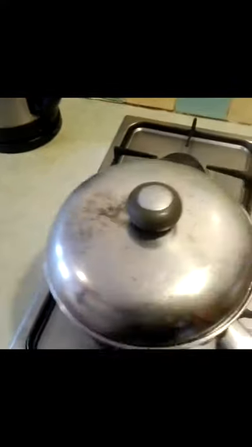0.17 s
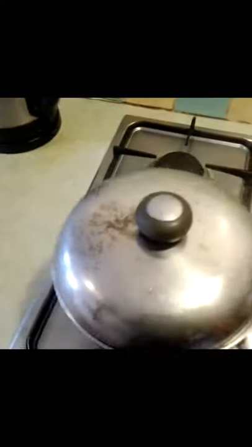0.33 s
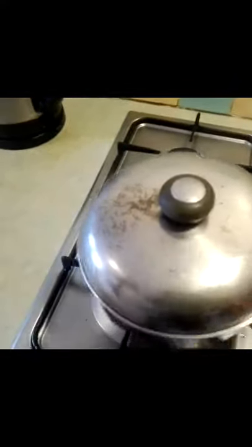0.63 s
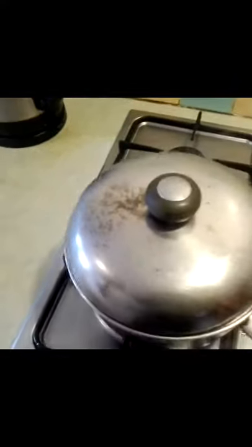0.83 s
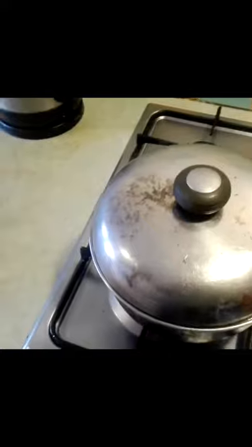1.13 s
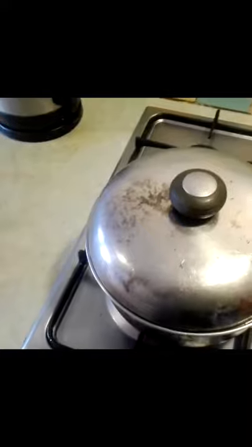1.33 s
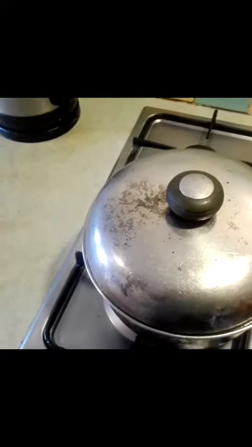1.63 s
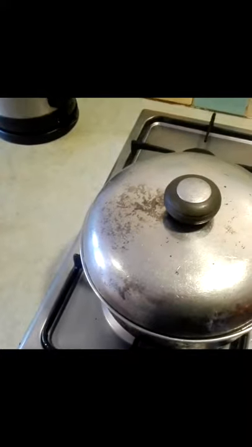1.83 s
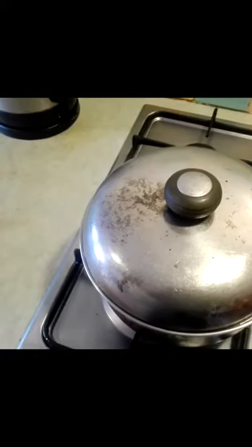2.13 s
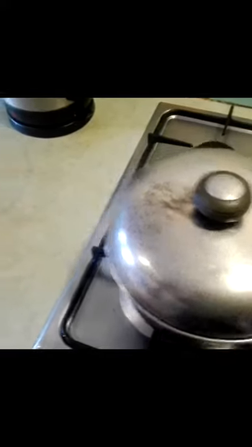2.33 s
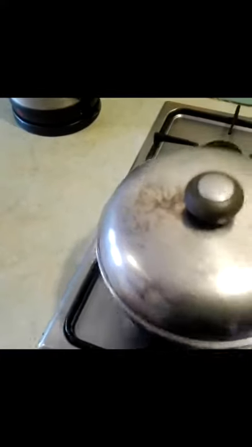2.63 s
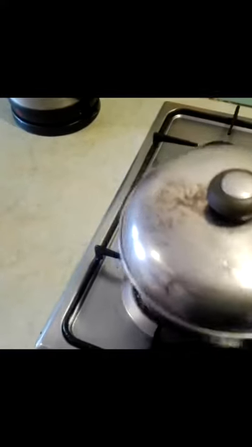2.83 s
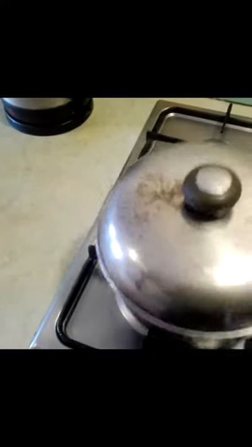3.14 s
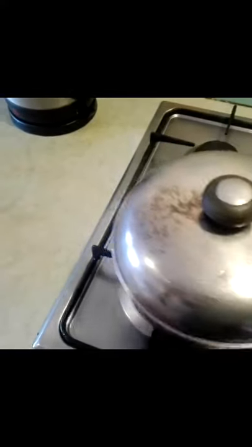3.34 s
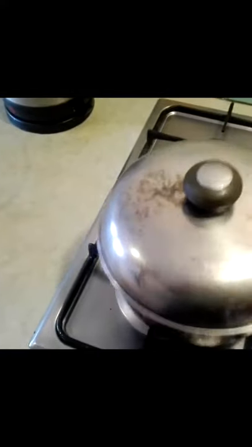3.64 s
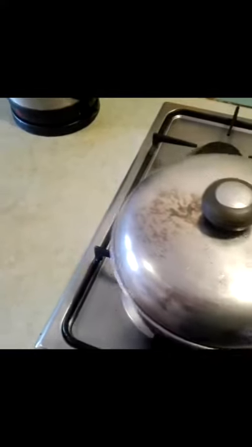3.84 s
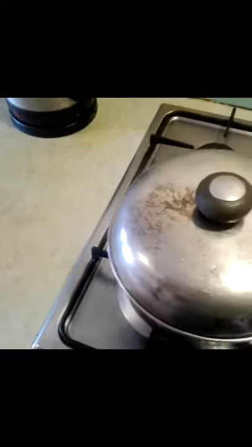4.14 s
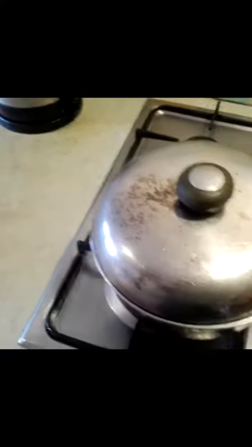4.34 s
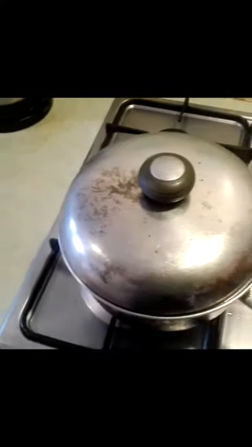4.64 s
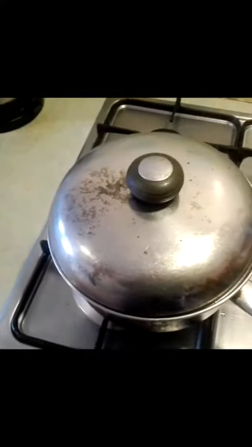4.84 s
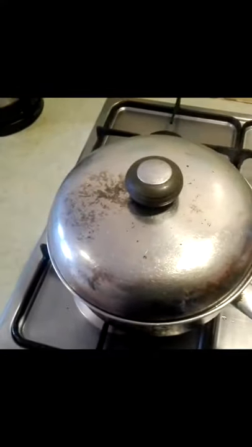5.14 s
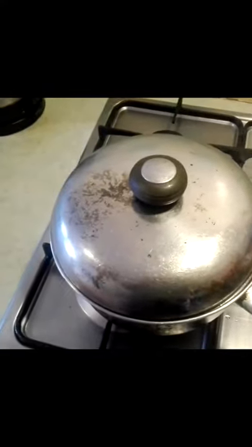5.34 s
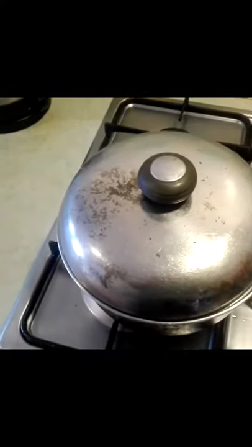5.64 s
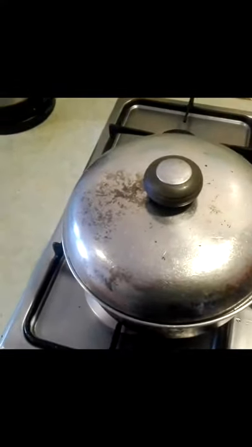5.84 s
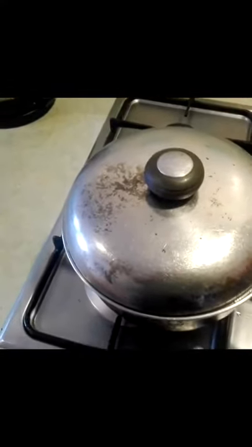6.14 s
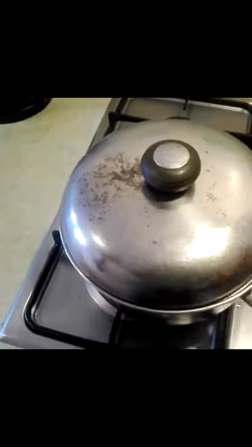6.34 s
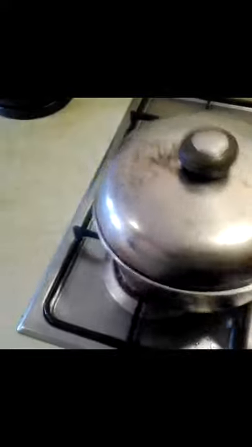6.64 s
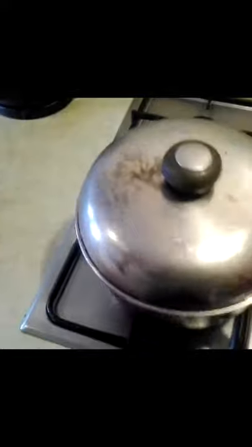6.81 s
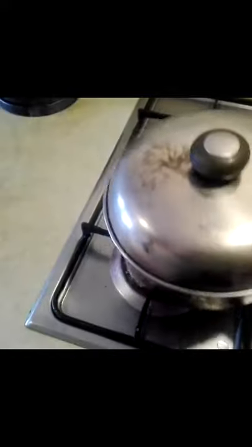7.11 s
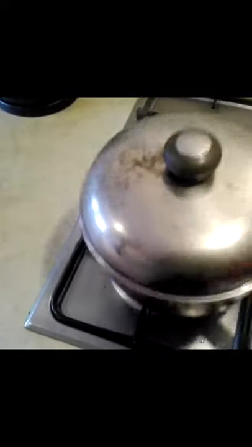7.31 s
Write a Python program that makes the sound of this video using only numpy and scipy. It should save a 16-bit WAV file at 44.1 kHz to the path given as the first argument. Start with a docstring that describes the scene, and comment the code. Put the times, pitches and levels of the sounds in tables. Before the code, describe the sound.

Popcorn in a metal pot, heard closely from just over the lid. Fast irregular pops, each a bright snap with a short metallic ring and dull boom, come over a faint low burner flutter. A rattling shake of steel against iron follows, mixed with more pops. Popping thins to lone bursts and soft taps before another rough shake, with one very heavy clang, ends it. The small room adds short reflections.

```python
"""Popcorn pops in a lidded steel pot on a gas hob, heard from just above the lid in a small kitchen.
Each kernel makes a noisy click, rings the lid and booms through the low notes of the hollow pot.
Now and then the pot is shaken: random little slips scrape, corn clacks and low noise rumbles in the hob.
The pot also knocks on the iron grate with a clang, a tick and a thud. Faint taps and a rattle come between.
The burner is softly fluttering low noise underneath."""
import sys
import numpy as np
from scipy import signal
from scipy.fft import rfft, irfft
from scipy.io import wavfile
from scipy.ndimage import uniform_filter1d, map_coordinates

SR = 44100
rng = np.random.default_rng(int(sys.argv[2]) if len(sys.argv) > 2 else 0)


def store_wav(level_fs):
    """Save 16-bit WAV to argv[1]."""
    pcm = np.round(np.clip(np.atleast_2d(level_fs), -1, 1) * 32767)
    wavfile.write(sys.argv[1], SR, pcm.T.astype(np.int16))


N = 329427
TIME = np.arange(N) / SR  # time in the scene [s]
AGE = np.arange(SR // 2) / SR  # time since a blow [s]

# Event levels are set before each layer's own trim; levels of notes and colours are relative.
# bursting kernels: (time [s], crack [dB], lid ring [dB], lid pitch [Hz], hollow boom [dB])
KERNELS = [(-.05, -7.5, -33, 1390, -27.5), (0.2294, -13, -30, 1362, -20), (0.4916, -15, -33, 1450, -21),
           (0.628, -27.5, -26.5, 1452, -26.5), (0.7344, -19.5, -32, 1367, -29.5),
           (0.8133, -26.5, -41, 1390, -22.5), (0.9158, -17.5, -33, 1240, -24.5),
           (0.974, -34.5, -48, 1410, -27.5), (1.107, -34.5, -40.5, 1324, -32.5),
           (1.258, -26.5, -34.5, 1110, -29.5), (1.3658, -23.5, -38, 1220, -24),
           (1.459, -31.5, -41.5, 1330, -35.5), (1.4875, -27, -34, 1360, -30.5),
           (1.499, -23.5, -33.5, 1330, -34), (1.6203, -20, -35.5, 1410, -26.5),
           (1.7294, -28.5, -43.5, 1390, -27.5), (1.8029, -48, -47.5, 1580, -39),
           (1.8278, -34.5, -64.5, 1530, -49), (2.2264, -5.5, -31, 1410, -42.5),
           (2.5211, -28.5, -35.5, 1360, -25.5), (2.916, -15, -32.5, 1456, -30),
           (3.1014, -41, -41.5, 1034, -36), (3.144, -23.5, -33.5, 1400, -22),
           (3.2028, -32.5, -33, 1790, -44), (3.5322, -25, -40, 1470, -25.5), (3.613, -22, -26.5, 1306, -21),
           (3.708, -33, -34.5, 1600, -37), (3.8156, -8, -23, 1350, -30.5),
           (4.0899, -29.5, -34.5, 1340, -28), (4.1513, -35, -36, 1354, -25.5),
           (4.1985, -26, -36.5, 1270, -27), (4.2055, -23, -38.5, 1334, -32.5),
           (4.9715, -24.5, -29, 1637, -23.5), (5.8872, -23, -45.5, 1486, -31.5),
           (6.3049, -35, -39, 1480, -33), (7.202, -13.5, -33, 1314, -26.5), (7.2871, -30, -34, 1370, -24.5)]
# notes of the lid's edge that sing on: (time [s], pitch [Hz], level before rise and decay [dB])
SINGING_NOTES = [(0.2298, 3560, -59), (2.2256, 4220, -50), (5.8874, 4210, -49.5)]
# the pot bumps on the grate: (time [s], clang [dB], clang pitch [Hz], metal tick [dB], hob thud [dB])
GRATE_BUMPS = [(0.338, -23.5, 1360, -58, -22.5), (0.376, -24.5, 1290, -41.5, -44),
               (0.584, -34, 1640, -52, -46.5), (2.385, -41, 1290, -40, -46), (2.587, -34.5, 1160, -37, -28),
               (2.638, -19.5, 1650, -25.5, -27), (2.718, -17, 1700, -18.5, -21),
               (2.75, -26, 1400, -55, -28.5), (2.793, -25.5, 1420, -55, -25.5),
               (2.836, -17.5, 1380, -28, -42), (2.937, -33, 1630, -49, -53), (3.083, -34, 1150, -69, -31.5),
               (3.245, -22, 1040, -54, -16), (3.263, -23, 1350, -29, -29), (3.288, -20, 1420, -36, -27),
               (3.35, -29, 1540, -35.5, -44), (3.428, -33, 1600, -46, -60), (3.515, -40, 1310, -61, -57),
               (3.648, -24.5, 1280, -35, -33), (3.69, -34, 991, -44, -22), (3.761, -25, 1400, -35, -19),
               (3.821, -21.5, 1420, -19.5, -29.5), (3.942, -36, 1400, -57, -73),
               (6.55, -39.5, 1364, -56, -64), (6.625, -38.5, 1310, -40, -37.5),
               (6.745, -36, 1370, -53, -30.5), (6.761, -21, 1680, -23.5, -22),
               (6.819, -16.5, 1380, -21, -22), (6.892, -4.5, 1303, -21.5, -12.5),
               (6.954, -20.5, 1380, -31, -31), (7.022, -21, 1040, -56, -52.5),
               (7.346, -23, 1450, -31, -18.5), (7.366, -20.5, 1380, -31.5, -30),
               (7.437, -18.5, 1300, -22, -16.5)]
# soft dull taps: (time [s], level [dB])
SOFT_TAPS = [(2.119, -54), (5.245, -36), (5.343, -47), (5.8, -45.5), (5.991, -44), (6.089, -51),
             (6.128, -51.5)]
# a faint hollow rattle: (time [s], level [dB])
FAINT_RATTLE = [(5.41, -40.5), (5.428, -40), (5.454, -35.5), (5.478, -43)]
# vigour of each bout of shaking: (time [s], vigour [dB])
SHAKING_BOUTS = [
    [(0.0, -59), (0.282, -64), (0.406, -56.5), (0.524, -49), (0.798, -57), (0.918, -46), (0.98, -51.5)],
    [(2.36, -57), (2.402, -52.5), (2.594, -66), (2.772, -31), (2.822, -44), (2.914, -39.5), (2.98, -46)],
    [(3.12, -45), (3.346, -44), (3.678, -47), (3.788, -41), (3.924, -52.5), (4.05, -58.5)],
    [(6.4, -56.5), (6.476, -61.5), (6.646, -49.5), (6.68, -71)],
    [(6.77, -61), (6.81, -35), (6.926, -50), (7.078, -42), (7.234, -49), (7.47, -50)],
]

# ringing notes of the air in the pot: (pitch [Hz], level [dB], time to fall 60 dB [s])
HOLLOW_NOTES = [(42, -14, 0.28), (67.63, -12.5, 0.64), (92.9, -1.5, 0.22), (174.6, 2.5, 0.12),
                (218.9, 2, 0.21), (217.6, 11, 0.004), (244, -8, 0.088), (345, -18.5, 0.24)]
# ringing notes of the lid: (pitch [Hz], level [dB], time to fall 60 dB [s])
LID_NOTES = [(1064, -12, 0.19), (1043, 1, 0.086), (1192, 0, 0.19), (1303, 6.5, 0.14), (1400, -1, 0.22),
             (1610, -2, 0.3), (1750, -9, 0.055), (1890, -15.5, .2), (1943, -8.5, 0.18), (2350, -13, 0.2)]
# ringing notes of the lid's edge: (pitch [Hz], level [dB], time to fall 60 dB [s])
EDGE_NOTES = [(2190, -4, 0.17), (2700, -5, 0.1), (2965, -10.5, 0.34), (3620, -7, 0.25), (4103, -8, 0.12),
              (4340, -2, 0.27), (4830, -9.5, 0.11), (5370, 1.5, 0.11), (5510, -1, 0.11), (6130, 15, 0.023)]
# ringing notes of the pot: (pitch [Hz], level [dB], time to fall 60 dB [s])
POT_NOTES = [(581, -21.5, 0.036), (699, -18.5, 0.17), (820, -22, 0.33), (986, 1, 0.075), (1086, -4.5, 0.23),
             (1075, -10, .2), (1170, -16.5, 0.25), (1265, -16, 0.1), (1384, -4.5, 0.25), (1436, -9, 0.2),
             (1475, -22.5, .25), (1586, -3, 0.22), (1637, -12, .2), (1720, -18, 0.16)]
# low notes of the hob: (pitch [Hz], level [dB], time to fall 60 dB [s])
HOB_NOTES = [(39, 2, 0.69), (45.34, 0, 0.54), (55.9, 5, 0.32), (66.3, -0.5, 0.59), (73, -7, 0.14),
             (98.4, -14.5, 1)]

# colour of the hull's crack: (frequency [Hz], level per Hz [dB])
CRACK_COLOUR = [(3000, -39), (6000, -17), (7500, -6.5), (8500, 2.5), (9400, 1), (10300, -6.5),
                (11600, -9.5), (12600, -14), (14000, -21), (16000, -39)]
# colour of the snap at the lid: (frequency [Hz], level per Hz [dB])
SNAP_COLOUR = [(1200, -30), (2100, -9.5), (2450, -20.5), (2900, -8.5), (3400, -11), (4400, -7),
               (5400, -5.5), (6500, -6.5), (8000, -0.5), (12000, -35)]
# colour of the struck lid and the pot's clang: (frequency [Hz], level per Hz [dB])
CLANG_COLOUR = [(300, -48), (750, -24.5), (950, -6), (1130, 1), (1400, 5.5), (1650, -5.5), (1850, -12),
                (2100, -9), (2500, -26), (5000, -47.5)]
# colour of the metal tick and the sliding hiss: (frequency [Hz], level per Hz [dB])
TICK_COLOUR = [(1200, -19.5), (2000, 2.5), (2400, -4.5), (2700, -4), (3300, -9.5), (4400, -2), (7300, -4.5),
               (8600, -0.5), (10500, -6.5), (14000, -25)]
# colour of the base's dull knock: (frequency [Hz], level per Hz [dB])
KNOCK_COLOUR = [(80, -25.5), (160, -1), (240, 6), (350, -0.5), (430, -8.5), (490, -10.5), (550, -6.5),
                (660, -16), (900, -8), (2000, -44.5)]
# colour of the soft taps: (frequency [Hz], level per Hz [dB])
TAP_COLOUR = [(25, -11), (65, 8.5), (130, 7), (250, -5), (400, -23), (550, -21.5), (750, -30), (1400, -30),
              (2000, -55)]
# colour of the faint rattle: (frequency [Hz], level per Hz [dB])
RATTLE_COLOUR = [(100, -8), (220, 3.5), (300, -4.5), (450, -34), (640, -20), (850, -11), (1100, -23),
                 (1340, -9.5), (1570, -30), (1850, -13), (2050, -29.5), (2400, -59)]
# colour of the corn and the scrape: (frequency [Hz], level per Hz [dB])
SCRAPE_COLOUR = [(400, -16), (750, -23), (1000, -5), (1380, 1), (1650, 1), (2100, -9.5), (2500, -22.5),
                 (2900, -22.5), (3600, -26.5), (6000, -41)]
# colour of the base rubbing on the grate: (frequency [Hz], level per Hz [dB])
RUB_COLOUR = [(100, -31.5), (230, 0.5), (350, 9), (450, -1.5), (550, -9), (750, -22), (2000, -43.5)]
# colour of the boom in the kitchen: (frequency [Hz], level per Hz [dB])
BOOM_COLOUR = [(50, -16.5), (97, 3), (130, -12.5), (175, -2.5), (222, 1.5), (275, -13), (305, -17),
               (350, -8.5), (420, -25.5), (700, -47.5)]
# colour of the flame: (frequency [Hz], level per Hz [dB])
BURNER_COLOUR = [(15, -34), (25, 7.5), (36, 6.5), (136, -26.5), (244, -23), (525, -36), (802, -39),
                 (892, -30), (1160, -29.5), (2030, -34.5), (2310, -39.5), (3180, -36), (3440, -38.5),
                 (5120, -39), (14000, -40.5)]

# a harder burst snaps louder, and its click stands further out of its echoes [dB, then dB per dB]
SNAP_DB, SNAP_PER_CRACK, SNAP_PER_LID = -13.5, 0.42, 0.27
CLICK_DB, CLICK_PER_CRACK = 4, 0.31
SNAP_HZ, SNAP_SCATTER = 5390, 0.067  # middle pitch of the edge's note, and its spread (log scale)
EDGE_DB, TING_DB = -7, -9.5  # the edge's notes and its strongest note, beside the snap
SING_RISE_S, SING_T60_S = .015, 0.37
# the dull knock grows with both clang and thud [dB, then dB per dB]
KNOCK_DB, KNOCK_PER_CLANG, KNOCK_PER_THUD = -2.5, 0.83, 0.3
VIGOUR_DB = -47  # an ordinary shake
SETTLE_DB_PER_S = 231  # how fast vigour grows before a bout and falls after it
LURCH_HZ = 14  # knots a second in the uneven sliding
BURNER_DB = -61  # middle level of the fluttering flame
TOP_HZ = 14400  # upper band limit of the microphone


def amp(db):
    """Turn decibels into gain."""
    return 10 ** (np.asarray(db) / 20)


def unit(x):
    """Scale to an average (rms) level of 1."""
    return x / np.sqrt(np.mean(x ** 2) + 1e-20)


def crest(x, size=176):
    """Scale so that the loudest few milliseconds have rms 1."""
    return x / np.sqrt(uniform_filter1d(x ** 2, size).max() + 1e-20)


def wobble(rate):
    """Draw a smooth random curve with this many knots a second."""
    knots = rng.standard_normal(int(N * rate / SR) + 4)
    return map_coordinates(knots, [TIME * rate])


def colour(points, size=4096):
    """Make a filter whose strength at each frequency follows the points and that answers at once."""
    hz, db = np.transpose(points)
    bins = np.log(np.fft.rfftfreq(size, 1 / SR) + 1)
    gain = amp(np.interp(bins, np.log(hz), db))
    # folding this log spectrum puts the filter's energy as early as possible
    cepstrum = irfft(np.log(gain))
    cepstrum[1:size // 2] *= 2
    cepstrum[size // 2 + 1:] = 0
    return irfft(np.exp(rfft(cepstrum)))


def varied(points):
    """Make a colour filter with small random changes, since no two blows are quite alike."""
    hz, db = np.transpose(points)
    return colour(np.transpose([hz, db + 2 * rng.standard_normal(len(hz))]))


def through(x, response):
    """Pass x through a filter, an echo pattern or a ringing body."""
    return signal.fftconvolve(x, response)[:len(x)]


def partials(modes):
    """Make one dying oscillation, as complex numbers, for each note of a body."""
    hz, db, t60 = np.transpose(modes)[:, :, None]
    return amp(db - 60 * AGE / t60) * np.exp(2j * np.pi * hz * AGE)


def steel(t60, count=110):
    """Make the dense thicket of treble notes that thin steel has."""
    hz = np.linspace(2400, 14000, count) + rng.uniform(-50, 50, count)
    level = 2 * rng.standard_normal(count)
    return partials(np.transpose([hz, level, np.full(count, t60)]))


def favour(rows, hz, lift_db, width):
    """Lift, in dB, the notes near the pitch that a blow excites most."""
    return lift_db * np.exp(-(np.log(np.transpose(rows)[0] / hz) / width) ** 2)


def ring(bank, spread_db, bias_db=0):
    """Ring a body: each blow lands elsewhere, so it weights the notes anew."""
    level, phase = rng.standard_normal(len(bank)), rng.random(len(bank))
    weights = amp(spread_db * level + bias_db) * np.exp(2j * np.pi * phase)
    soft_start = 1 - np.exp(-AGE / 0.00086)
    return crest((weights @ bank).real * soft_start)


def echoes(pot_t60, room_db, room_t60):
    """Dense reflections as noise: a quick flurry in the pot, then the kitchen's tail."""
    fade = amp(-60 * AGE / pot_t60) + amp(room_db - 60 * AGE / room_t60)
    return rng.standard_normal(len(AGE)) * fade


def impulse():
    """A single sharp click."""
    return signal.unit_impulse(len(AGE))


def fading_tone(hz, t60):
    """One pure note that dies away."""
    return crest(amp(-60 * AGE / t60) * np.sin(2 * np.pi * hz * AGE))


def add(track, s, sound):
    """Mix a sound into the track from time s on."""
    start = round(s * SR)
    sound = sound[max(-start, 0):]  # skip what lies before the scene starts
    part = track[max(start, 0):][:len(sound)]
    part += sound[:len(part)]


def burner():
    """The low flame flutters softly: coloured noise with a wandering level."""
    flame = unit(through(rng.standard_normal(N), colour(BURNER_COLOUR)))
    return amp(BURNER_DB + 3.1 * wobble(6.7)) * flame


def taps():
    """Faint muffled taps and a brief rattle: coloured echoes, led by a click in the taps."""
    out = np.zeros(N)
    for s, db in SOFT_TAPS:
        push = amp(29.0) * impulse() + echoes(pot_t60=0.061, room_db=-6.0, room_t60=0.31)
        add(out, s, amp(db - 2.0) * crest(through(push, colour(TAP_COLOUR))))
    for s, db in FAINT_RATTLE:
        shake = echoes(pot_t60=0.054, room_db=-8.5, room_t60=0.53)
        add(out, s, amp(db - 10) * crest(through(shake, colour(RATTLE_COLOUR))))
    return out


def grit(rate, spread_db):
    """Tiny slips of uneven size at random moments."""
    happens = rng.random(N) < rate / SR
    return happens * rng.standard_normal(N) * amp(spread_db * rng.standard_normal(N))


def tumbling(rate, spread_db, size=2600):
    """Puffed corn tumbles against the wall: little clacks, each at its own pitch."""
    out, age = np.zeros(N), AGE[:size]
    for when, pitch, weight in rng.random((int(rate * N / SR), 3)):
        hz = 900 * 2.4 ** pitch
        clack = np.sin(2 * np.pi * hz * age) * amp(-60 * age / age[-1])
        add(out, when * N / SR, amp(spread_db * weight) * clack)
    return unit(out)


def stirred(db, growth, uneven_db):
    """Gain that follows the shaking: dB at ordinary vigour, dB per dB of vigour, unevenness in dB."""
    bouts = []
    for s, level in map(np.transpose, SHAKING_BOUTS):
        outside = np.abs(TIME - np.clip(TIME, s[0], s[-1]))  # seconds away from this bout
        bouts.append(np.interp(TIME, s, level) - SETTLE_DB_PER_S * outside)
    vigour = np.max(bouts, axis=0) - VIGOUR_DB
    return amp(db + growth * vigour + uneven_db * wobble(LURCH_HZ))


def sliding():
    """The base stutters over the grate, stirring the pot's notes, tossing the corn and rocking the hob."""
    slips = grit(rate=3400, spread_db=2) * amp(2 * wobble(35))
    clacks = unit(through(tumbling(rate=190, spread_db=16, size=2300), colour(SCRAPE_COLOUR)))
    scrape = unit(through(slips, colour(SCRAPE_COLOUR)))
    drone = unit(through(slips, partials(POT_NOTES).real.sum(axis=0)))
    corn = unit(clacks + amp(-4) * scrape + amp(-10) * drone)
    rub = unit(through(slips, colour(RUB_COLOUR)))
    # the kitchen smears the fine treble of the slips into a smooth hiss
    smeared = through(slips, echoes(pot_t60=.05, room_db=-6, room_t60=.3))
    hiss = unit(through(smeared, colour(TICK_COLOUR)))
    rumble = unit(through(rng.standard_normal(N), partials(HOB_NOTES).real.sum(axis=0)))
    out = stirred(db=-50, growth=0.88, uneven_db=2.3) * corn
    out += stirred(db=-54.5, growth=.8, uneven_db=6.7) * rub
    out += stirred(db=-61.5, growth=.7, uneven_db=3) * hiss
    out += stirred(db=-47.5, growth=0.73, uneven_db=2) * rumble
    return out


def knocks():
    """Steel meets the iron grate: a tick, the pot's clang, a dull knock and a slow thud of the hob."""
    out = np.zeros(N)
    pot, hob, thicket = partials(POT_NOTES), partials(HOB_NOTES), steel(t60=0.2)
    for s, clang_db, clang_hz, tick_db, thud_db in GRATE_BUMPS:
        blow = amp(17) * impulse() + echoes(pot_t60=.05, room_db=-15, room_t60=.27)
        clang = crest(through(blow, varied(CLANG_COLOUR)))
        note = ring(pot, spread_db=3.5, bias_db=favour(POT_NOTES, clang_hz, lift_db=9.0, width=0.066))
        add(out, s, amp(clang_db - 13) * clang + amp(clang_db - 11) * note)

        shimmer = amp(-5) * ring(thicket, spread_db=5)
        metal = shimmer + echoes(pot_t60=0.06, room_db=-4, room_t60=0.34)
        add(out, s, amp(tick_db - 10.5) * crest(through(metal, varied(TICK_COLOUR))))

        knock_db = KNOCK_DB + KNOCK_PER_CLANG * clang_db + KNOCK_PER_THUD * thud_db
        base = echoes(pot_t60=0.07, room_db=-6.0, room_t60=0.43)
        add(out, s, amp(knock_db - 6.0) * crest(through(base, varied(KNOCK_COLOUR))))

        thud = ring(hob, spread_db=7) * (1 - np.exp(-AGE / 0.0024))
        add(out, s, amp(thud_db - 4.5) * crest(thud))
    return out


def singing():
    """A kernel hits the lid's edge squarely, and one lightly damped note outlasts the pop."""
    out = np.zeros(N)
    for s, hz, db in SINGING_NOTES:
        envelope = amp(db - 60 * AGE / SING_T60_S) * (1 - np.exp(-AGE / SING_RISE_S))
        add(out, s, envelope * np.sin(2 * np.pi * hz * AGE))
    return out


def hull_tear():
    """The hull tears as a click with very brief noise, and the lid throws it back a moment later."""
    tear = rng.standard_normal(len(AGE)) * amp(-60 * AGE / .003)
    tear = tear / np.linalg.norm(tear) + impulse()
    return tear + amp(-7) * np.roll(tear, round(SR * rng.uniform(.0008, .0016)))


def crack(tear, shimmer, click_db):
    """The torn hull's click, with a little steel shimmer and dense echoes."""
    split = amp(click_db + 23.5) * tear + shimmer / 2
    split = split + echoes(pot_t60=0.039, room_db=-14.0, room_t60=0.29)
    return crest(through(split, varied(CRACK_COLOUR)))


def lid_snap(tear, shimmer, click_db, rim):
    """The click snaps at the lid, and its edge rings, with one strong note of its own each time."""
    shell = amp(click_db - 0.5) * tear + shimmer
    shell = shell + echoes(pot_t60=0.087, room_db=-2.0, room_t60=0.32)
    ting = fading_tone(SNAP_HZ * np.exp(SNAP_SCATTER * rng.standard_normal()), t60=.15)
    edge = amp(EDGE_DB) * ring(rim, spread_db=4.5) + amp(TING_DB) * ting
    return crest(through(shell, varied(SNAP_COLOUR))) + edge


def lid_strike(lid, lid_hz):
    """The flying kernel hits the lid: a short tock and a ring near the same pitch."""
    blow = amp(24.5) * impulse() + echoes(pot_t60=0.025, room_db=-4, room_t60=0.32)
    struck = crest(through(blow, varied(CLANG_COLOUR)))
    note = ring(lid, spread_db=5.5, bias_db=favour(LID_NOTES, lid_hz, lift_db=6, width=0.16))
    tock = fading_tone(lid_hz, t60=.07)
    return amp(-6) * tock + amp(-5) * struck + amp(-11.0) * note


def hollow_boom(hollow):
    """The puff's pressure step starts all the low notes together; the kitchen blurs their tail."""
    weights = amp(2.5 * rng.standard_normal(len(hollow)))
    boom = -weights @ hollow.imag * (1 - np.exp(-AGE / .002))
    tail = through(echoes(pot_t60=.1, room_db=-6, room_t60=.28), varied(BOOM_COLOUR))
    return crest(boom) + amp(-7) * crest(tail)


def pops():
    """The hull splits with a click; the puff of steam booms in the pot and shakes the lid."""
    out = np.zeros(N)
    hollow, lid, rim = partials(HOLLOW_NOTES), partials(LID_NOTES), partials(EDGE_NOTES)
    thicket = steel(t60=.14)
    for s, crack_db, lid_db, lid_hz, boom_db in KERNELS:
        snap_db = SNAP_DB + SNAP_PER_CRACK * crack_db + SNAP_PER_LID * lid_db
        click_db = CLICK_DB + CLICK_PER_CRACK * crack_db
        tear = hull_tear()
        shimmer = amp(-3) * ring(thicket, spread_db=4)
        add(out, s, amp(crack_db - 4.5) * crack(tear, shimmer, click_db))
        add(out, s, amp(snap_db - 7.5) * lid_snap(tear, shimmer, click_db, rim))
        add(out, s, amp(lid_db) * lid_strike(lid, lid_hz))
        add(out, s, amp(boom_db - 1.0) * hollow_boom(hollow))
    return out


def scene():
    """The pot is dead ahead; only scattered treble differs between left and right."""
    mid = burner() + taps() + sliding() + knocks() + singing() + pops()
    scatter = rng.standard_normal(len(AGE)) * AGE * amp(-60 * AGE / .012)
    # how much treble is scattered: (frequency [Hz], level [dB])
    treble = through(mid, colour([(2500, -69), (4500, -60), (7000, -20.5), (10000, -9.0), (13000, -15.5)]))
    side = through(treble, scatter / np.linalg.norm(scatter))
    return np.array([mid + side, mid - side])


def record(dry):
    """The microphone sheds the deepest bass, rounds the loudest peaks and cuts what lies above its band."""
    heard = signal.sosfilt(signal.butter(3, 26, "high", fs=SR, output="sos"), dry)
    heard = heard / (1 + (heard / .68) ** 4) ** (1 / 4)  # peaks bend smoothly towards .68
    return signal.sosfilt(signal.ellip(10, .1, 90, TOP_HZ, fs=SR, output="sos"), heard)


dry = scene()
out = record(dry)
store_wav(out)
```